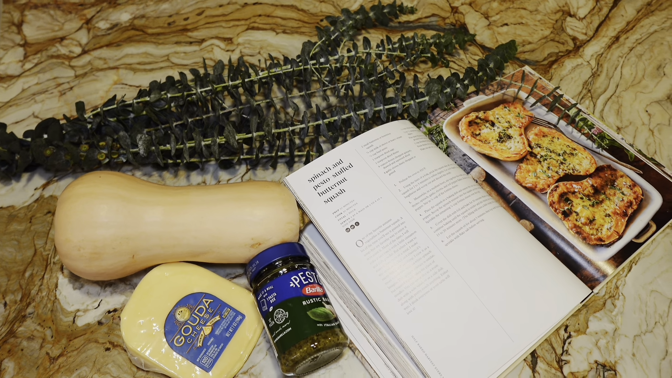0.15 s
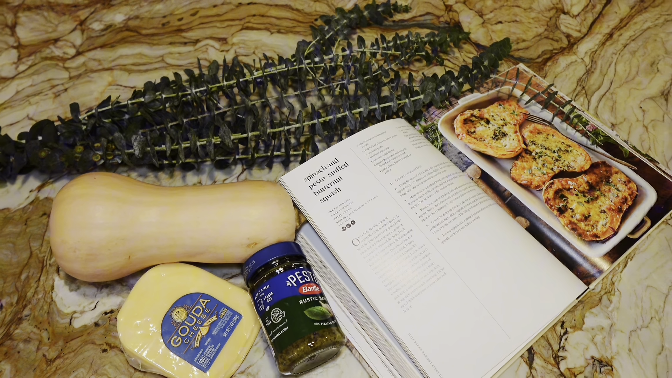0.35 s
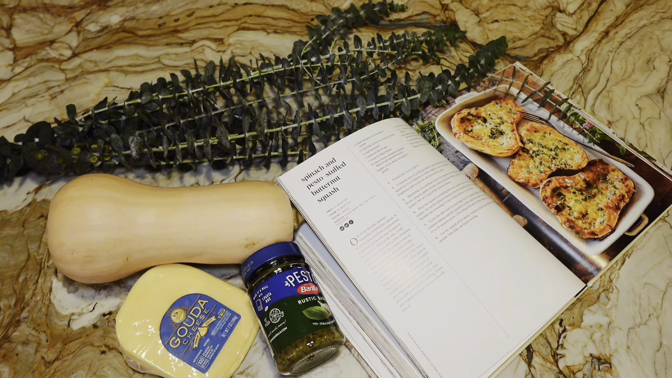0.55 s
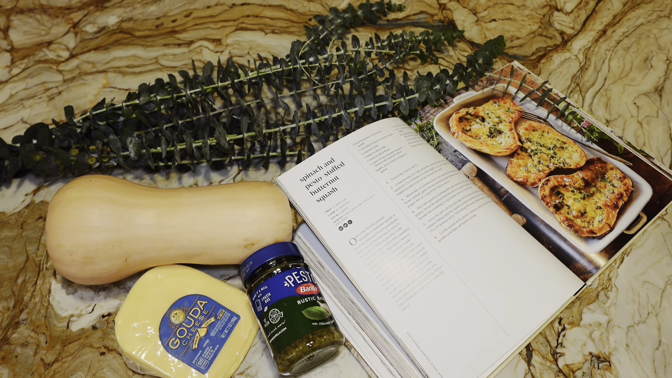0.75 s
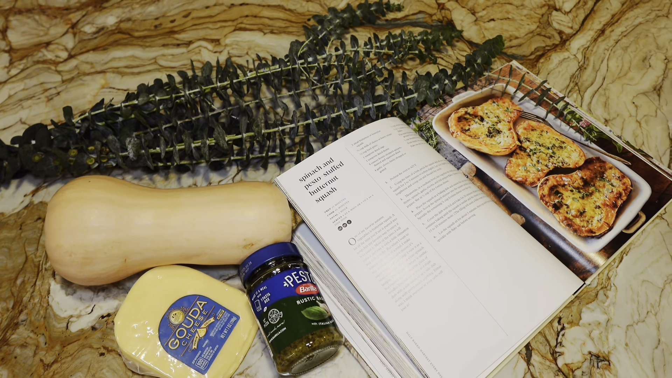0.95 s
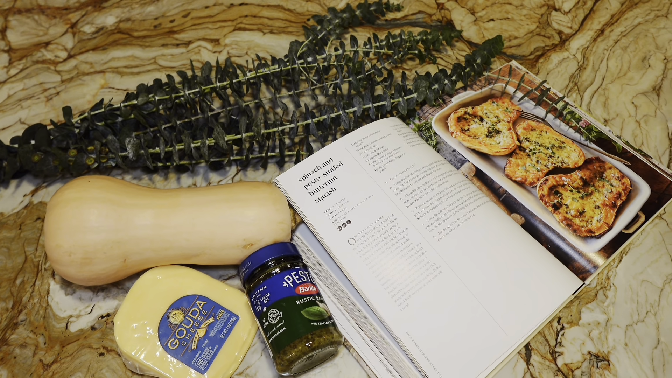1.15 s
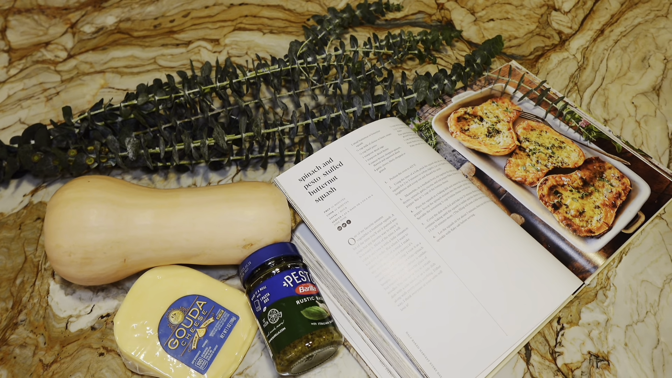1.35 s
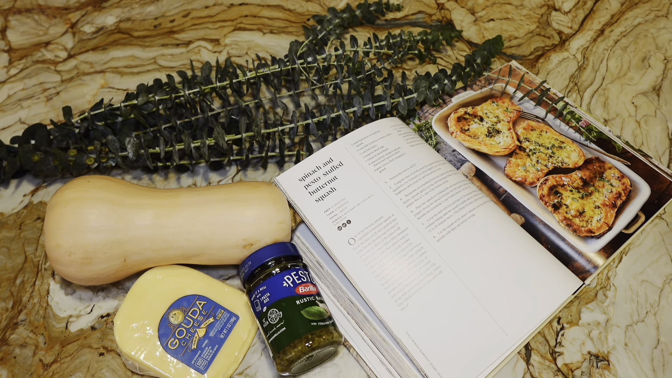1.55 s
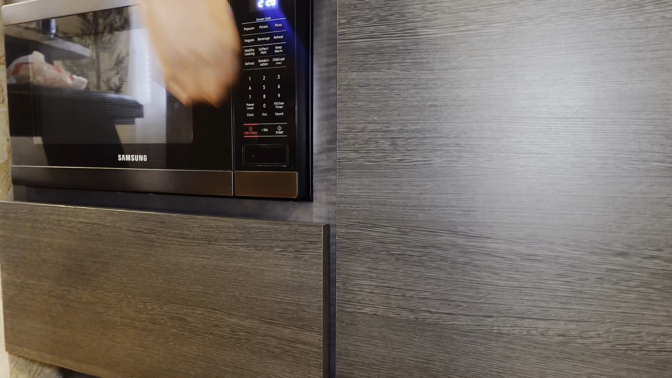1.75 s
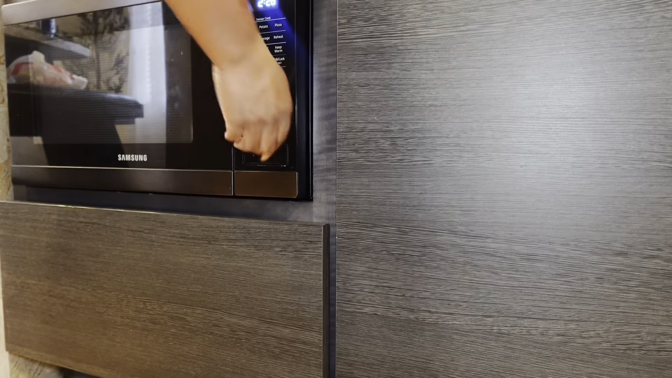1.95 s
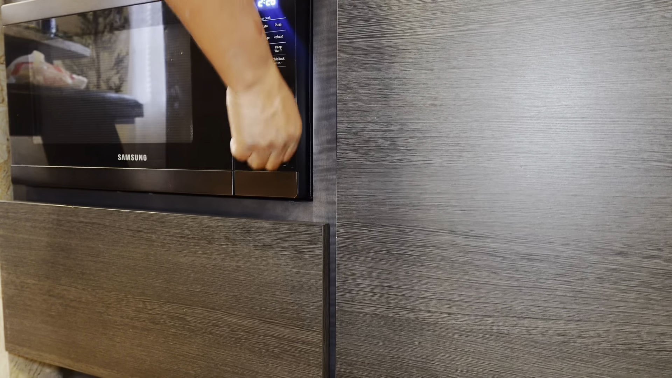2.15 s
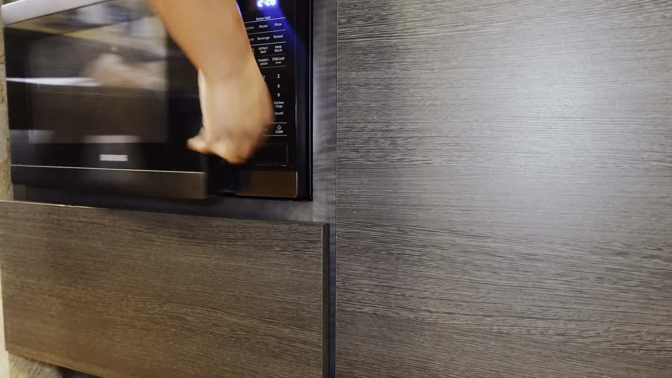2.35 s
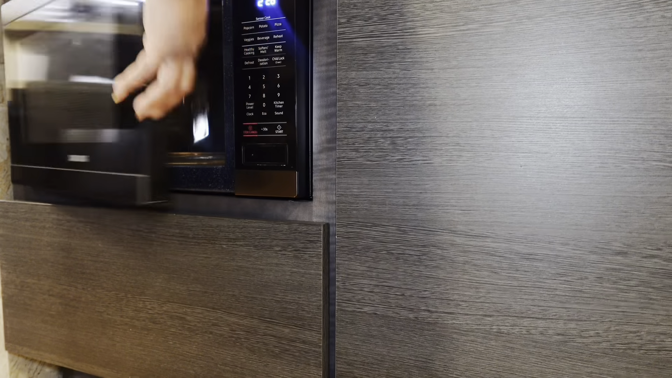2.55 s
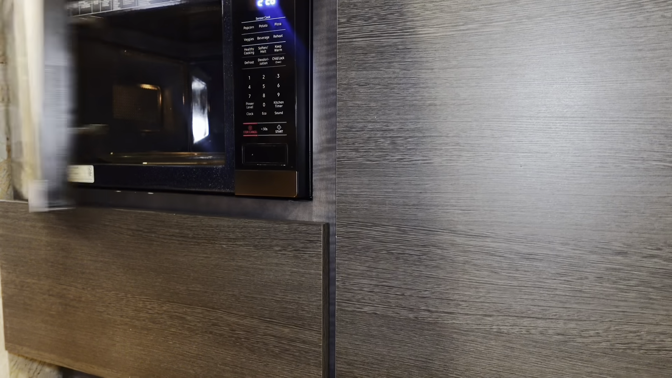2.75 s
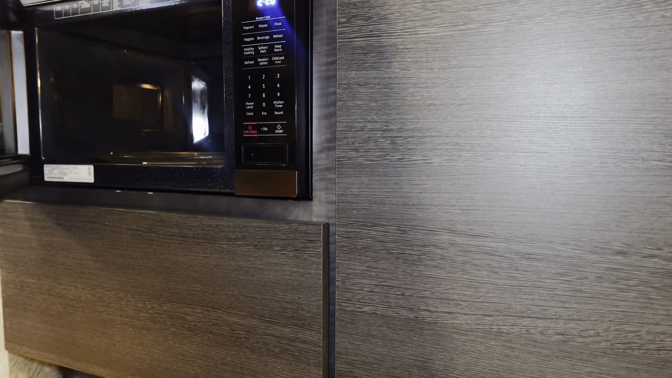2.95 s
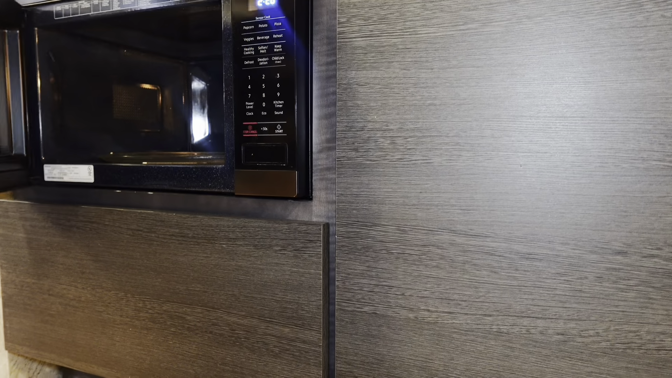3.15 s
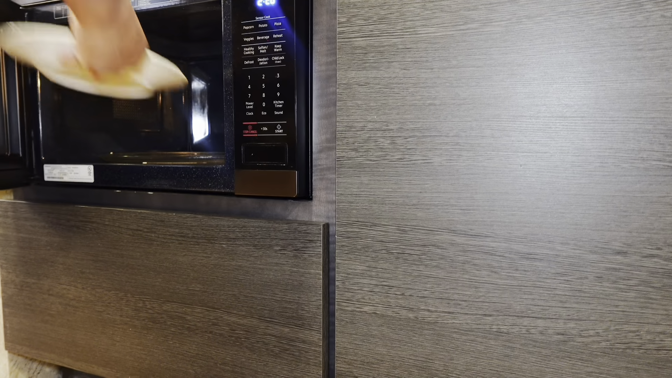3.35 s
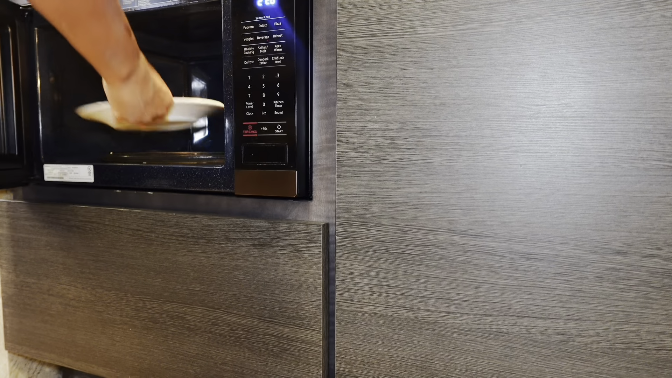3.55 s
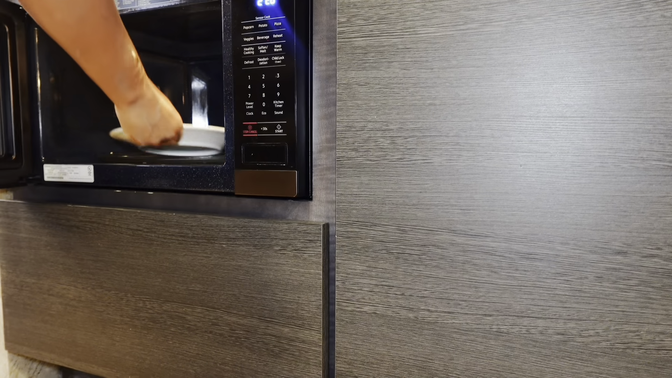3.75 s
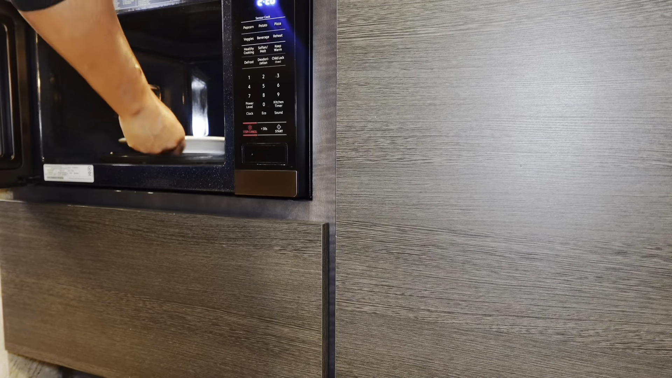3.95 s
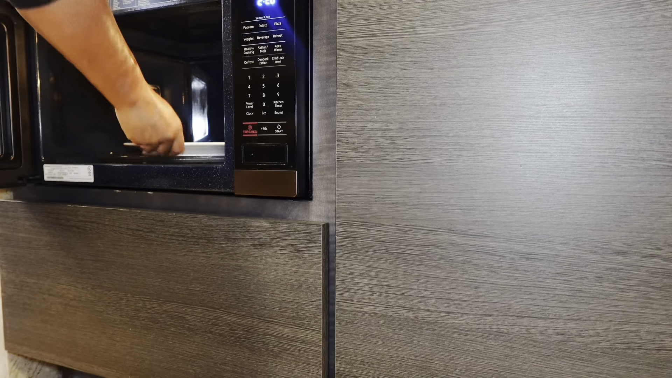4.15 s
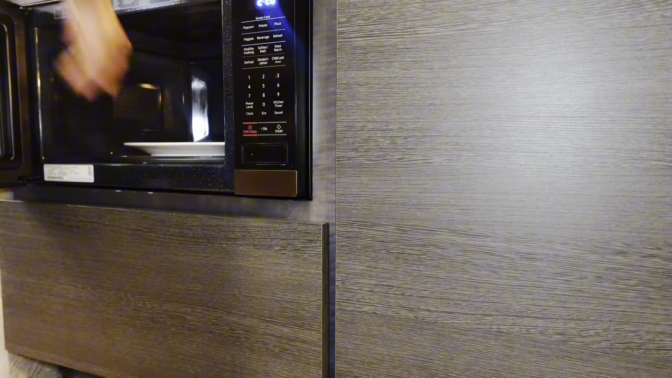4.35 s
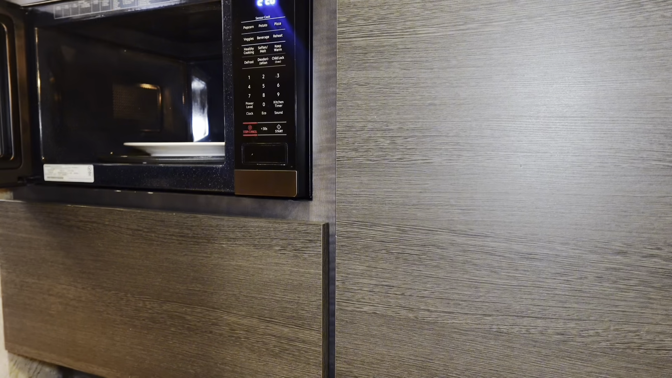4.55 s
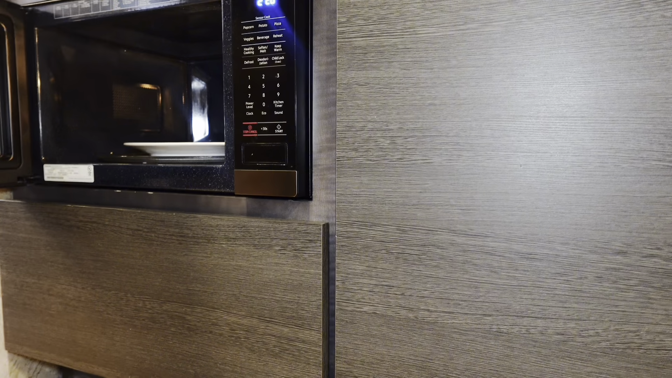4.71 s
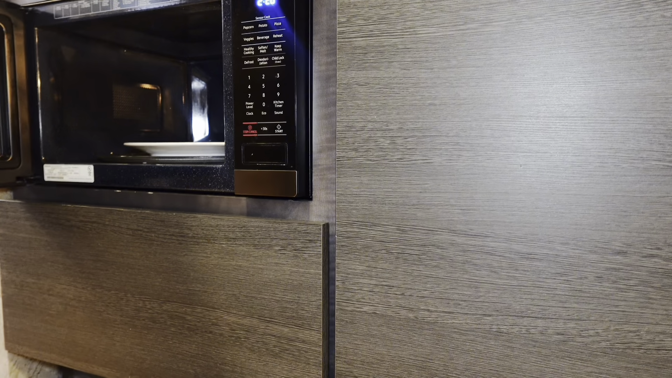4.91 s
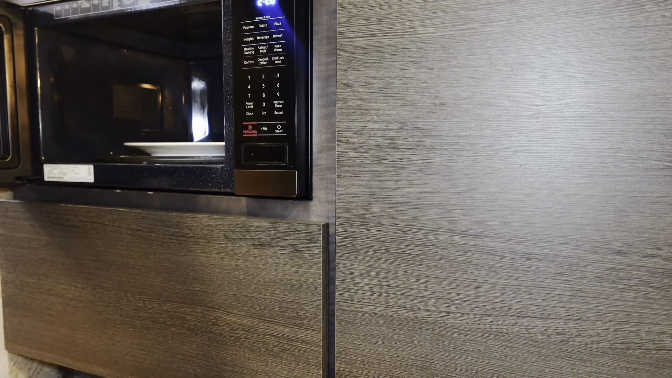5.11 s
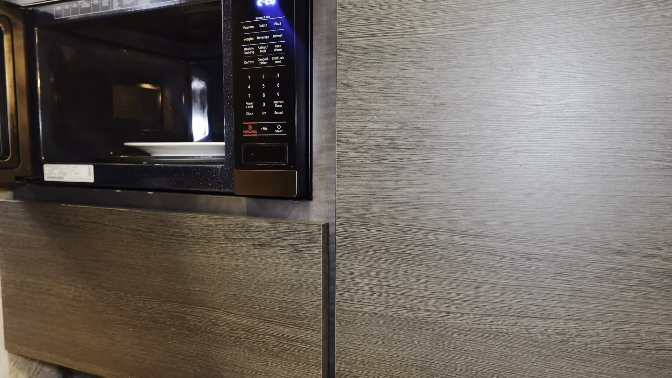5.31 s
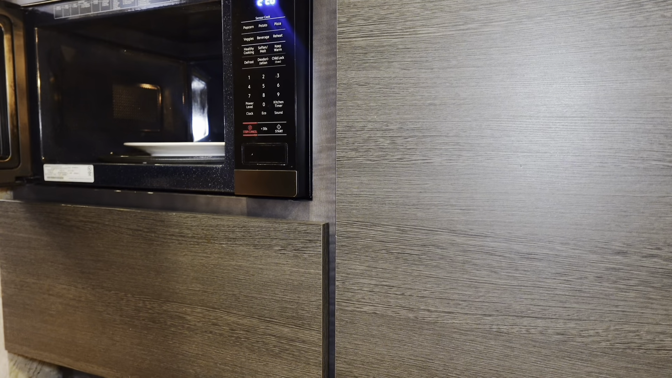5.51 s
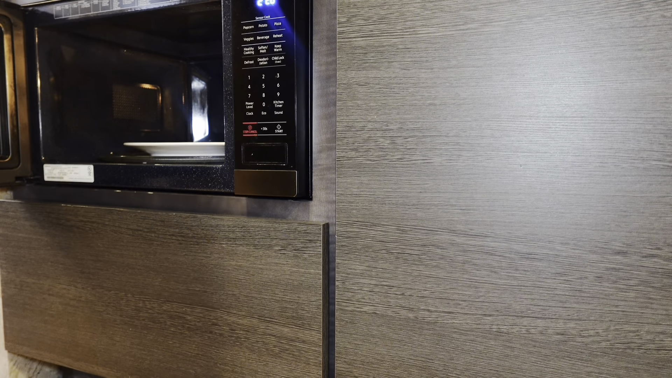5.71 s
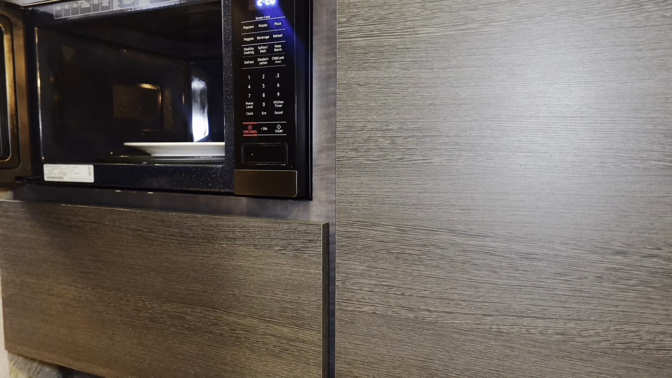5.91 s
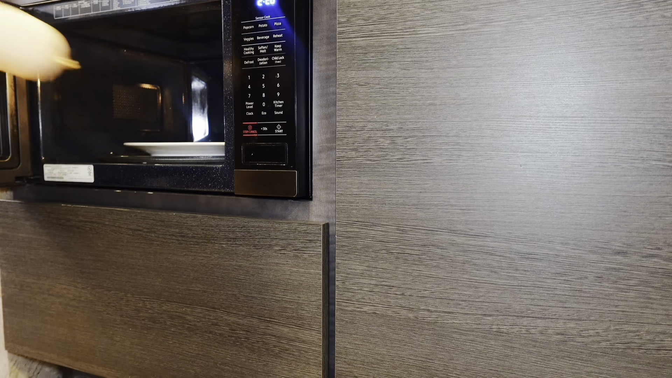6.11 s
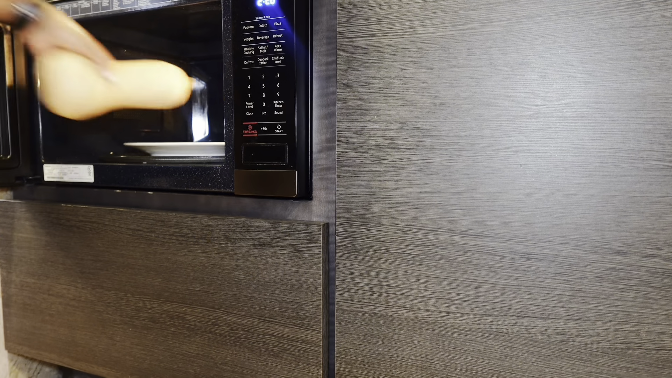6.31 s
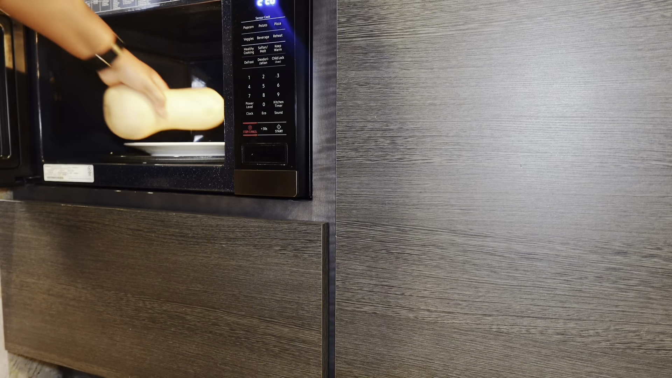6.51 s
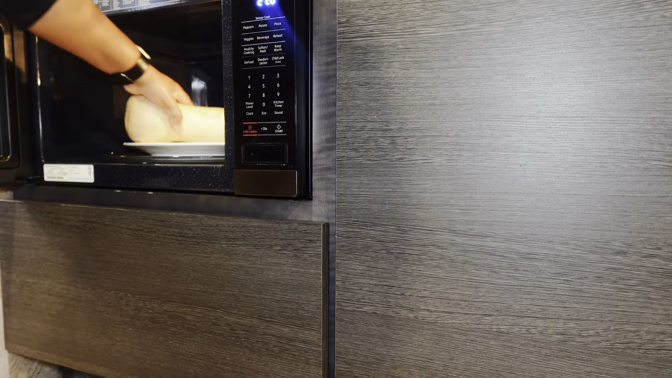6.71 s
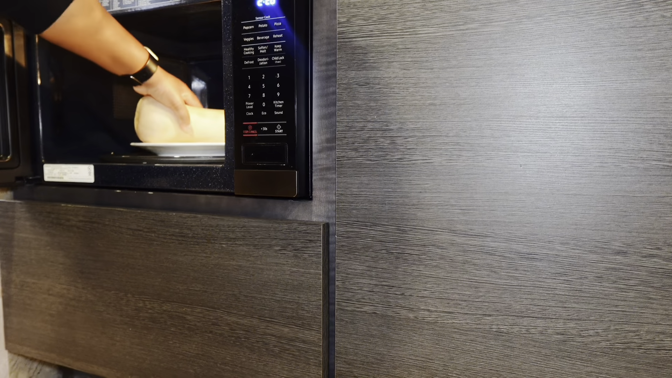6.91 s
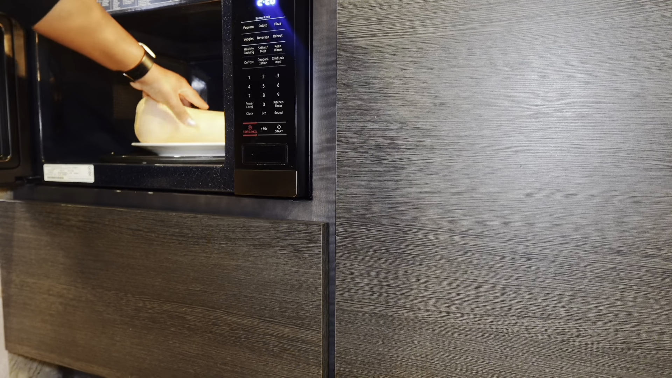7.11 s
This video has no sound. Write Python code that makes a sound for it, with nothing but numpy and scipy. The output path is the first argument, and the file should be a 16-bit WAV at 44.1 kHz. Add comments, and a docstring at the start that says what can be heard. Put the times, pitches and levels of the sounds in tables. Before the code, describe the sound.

Near-silent room hum with one small tick, then close handling of a microwave oven: sharp latch clunks, buzzing loose steel and a dull stop as the door opens. A ceramic plate hits and grates across glass, ringing briefly. The cook shuffles with sleeve rubs and light taps. Finally a heavy squash knocks and rocks on the plate, booming the oven floor. Muffled phone pickup in a reflective kitchen.

```python
"""Microwave oven in a kitchen

A quiet kitchen hums; then, close by, a microwave oven: the button frees the latch, the door swings to its stop.
A plate is slid onto the glass turntable, the cook shuffles about, and a squash is set on the plate.
Knocks are clicks through resonances, scrapes and rattles are gritty noise through modes, cloth is banded grit.
Hard walls add a diffuse tail; a phone with a dull microphone listens."""
import sys
import numpy as np
from scipy import signal
from scipy.fft import rfft, irfft
from scipy.io import wavfile
from scipy.ndimage import uniform_filter1d, minimum_filter1d

SR = 44100
rng = np.random.default_rng(int(sys.argv[2]) if len(sys.argv) > 2 else 0)


def digitize_waveform(pressure):
    """Quantize a signal to 16-bit integers and store it at the path in sys.argv[1].

    Rows of a 2-D input are taken as channels; values are limited to [-1, 1].
    """
    field = np.atleast_2d(pressure).T
    bounded = np.clip(field, -1, 1)
    quanta = np.round(bounded * 32767).astype(np.int16)
    wavfile.write(sys.argv[1], SR, quanta)


N = 316197
T = np.arange(N) / SR
SIDES = np.array([[1], [-1]])  # a side signal enters left and right with opposite signs


def undb(db):
    """Decibel law: amplitude ratio of a level."""
    return 10 ** (np.asarray(db) / 20)


def unit(x):
    """Normalization to an rms of 1."""
    return x / np.sqrt(np.mean(x ** 2))


def level_db(rows):
    """Level contour: (s, dB) points joined by straight lines, silent outside them."""
    s, db = np.transpose(rows)
    return np.interp(T, s, db, left=-200, right=-200)


def colour(x, points):
    """Spectral shaping by (Hz, dB) points on a logarithmic frequency axis."""
    hz, db = np.transpose(points)
    f = np.maximum(np.fft.rfftfreq(x.shape[-1], 1 / SR), 1)
    gain = undb(np.interp(np.log(f), np.log(hz), db))
    return irfft(rfft(x) * gain, x.shape[-1])


def ring(x, hz, width):
    """Simple resonator of the given bandwidth in Hz, with gain 1 at its centre."""
    b, a = signal.iirpeak(hz, hz / width, fs=SR)
    return signal.lfilter(b, a, x)


def band(x, lo_hz, hi_hz):
    """Band-pass filtering between two corner frequencies."""
    return signal.sosfilt(signal.butter(2, [lo_hz, hi_hz], "band", fs=SR, output="sos"), x)


def walk(rate):
    """Slow random modulation: levels held 1 / rate s and smoothed twice, rms 1."""
    k = int(SR / rate)
    steps = np.repeat(rng.standard_normal(N // k + 1), k)
    smooth = uniform_filter1d(uniform_filter1d(steps, k), k)
    return unit(smooth[:N])


def grit(spread_db, patchy_db):
    """Contact noise: dense tiny impacts of uneven size that come in clumps."""
    size = undb(spread_db * rng.exponential(size=N) + patchy_db * walk(90))
    return unit(size * rng.standard_normal(N))


def pair(x, pan_db):
    """Intensity stereo: left stands pan_db above right."""
    return x * undb(pan_db * SIDES / 2)


def swell(s, rise_s, hold_s, fade_s):
    """Exponential envelope: climbs 60 dB in rise_s to 1 at time s, holds, drops 60 dB in fade_s."""
    before = (s - T) / max(rise_s, .002)
    after = np.maximum(T - s - hold_s, 0) / max(fade_s, .01)
    return undb(-60 * np.where(T < s, before, after))


def strokes(rows):
    """Energy addition: layer gains from rows (s, rise s, hold s, fade s, dB per layer), summed in power."""
    shapes = np.array([swell(*row[:4]) for row in rows])
    layers = undb([row[4:] for row in rows]).T
    return np.sqrt(layers ** 2 @ shapes ** 2)


def room(x):
    """Diffuse reverberation: noise decaying at a rate set per band, less alike left and right in the treble."""
    # Decay of the walls. Each row: band centre in Hz, fall by 60 dB in seconds, level in dB.
    wall_bands = [(161, 1, -1.5), (364, 0.67, 2.5), (1020, 0.65, 1.5), (2500, 0.84, -6.5), (5000, 0.27, -1)]
    t = T[:SR]
    tail = 0
    for hz, t60, db in wall_bands:
        mid, side = (unit(band(rng.standard_normal(SR), hz / 1.64, hz * 1.67)) for _ in range(2))
        fade = np.sqrt(hz) * undb(db - 60 * t / t60)
        tail = tail + fade * (mid + np.clip(hz / 4000, .15, .7) * side * SIDES)
    tail = tail * np.clip((t - .008) / 0.017, 0, 1)  # the tail swells in between 8 and 25 ms after the hit
    tail = tail / np.sqrt(np.sum(tail[0] ** 2))
    return signal.fftconvolve(x[None], tail, axes=1)[:, :N]


def air():
    """Background of changing level: shaped noise, pure tones, a hum with a noisy halo, rumble and a hiss."""
    # Spectrum of the kitchen air. Each row: frequency in Hz, density in dB per Hz, relative.
    air_shape = [(25, -27), (80, -15.5), (114, -6), (145, -10.5), (303, -9.5), (350, -16.5), (453, -13),
                 (680, -19), (1670, -20), (2280, -21), (4030, -22.5), (7300, -26), (9490, -59)]
    # Its level. Each row: time in seconds, level in dB.
    air_contour = [(0, -63), (1.68, -65), (1.8, -54.5), (2.7, -57), (3.6, -57), (4.5, -50.5), (5.5, -54),
                   (6.5, -51), (7.17, -51.5)]
    # Thin tones, heard until 1.72 s. Each row: frequency in Hz, rms level in dB.
    early_tones = [(150.7, -71.5), (301.5, -79), (349.9, -86), (452.2, -76.5), (500.6, -75), (699.8, -75.5),
                   (802.1, -81), (1001, -80), (1200, -81), (1249, -84), (1400, -87), (1502, -82),
                   (1900, -82.5), (2299, -94), (2498, -81), (2998, -83)]
    # Mains hum. Each row: time in seconds, level in dB.
    hum_contour = [(0, -60.5), (.35, -59.5), (.75, -66.5), (1.4, -60.5), (1.8, -71), (1.95, -57),
                   (2.3, -62.5), (3.13, -51.5), (3.73, -55), (4.47, -56.5), (4.8, -46.5), (5.2, -53),
                   (5.95, -49), (6.55, -55), (7.07, -49), (7.17, -65.5)]
    # Hiss near the open oven: centre in Hz, width in Hz.
    hiss_band = (1970, 97)
    # Its level. Each row: time in seconds, level in dB.
    hiss_contour = [(1.75, -59), (1.95, -51.5), (2.9, -61), (3.4, -54), (3.7, -58), (4.7, -62.5),
                    (5.5, -59), (6.5, -57.5), (7.17, -55)]
    hum_hz, halo_width_hz, halo_db, octave_db = 119.6, 29, -10.5, -13  # halo and octave relative to the hum

    mid, side = (colour(rng.standard_normal(N), air_shape) for _ in range(2))
    side = colour(side, [(100, -13.0), (1000, -10.5), (3000, -9)])
    scale = np.std(band(mid, 150, 900))  # the level refers to this band
    tone = (mid + side * SIDES) / scale * undb(level_db(air_contour) + 0.64 * walk(2.92))

    lines = 0
    for hz, db in early_tones:
        lines = lines + np.sqrt(2) * undb(db) * np.sin(2 * np.pi * (hz * T + rng.random()))
    lines = lines * (T < 1.72)

    halo = ring(rng.standard_normal(N), hum_hz, halo_width_hz)
    halo = unit(ring(halo, hum_hz, 2 * halo_width_hz))
    turn = 2 * np.pi * hum_hz * T
    hum = np.sin(turn) + undb(octave_db) * np.sin(2 * turn) + undb(halo_db) * halo
    hum = undb(level_db(hum_contour)) * hum

    rumble = undb(-67.5) * unit(band(rng.standard_normal(N), 17, 62))  # deep, from the building
    hiss = unit(ring(rng.standard_normal(N), *hiss_band)) * undb(level_db(hiss_contour))
    return tone + lines + hum + rumble + hiss


def knocks():
    """Impact excitation: a click amid fading chatter rings one part, with a low thump and a bright snap."""
    # Short knocks and ticks. Each row: start in seconds, peak of the ring in dB, ring in Hz,
    # width as a share of it (held to 0.1..2), chatter's fall by 60 dB in seconds, thump, snap and
    # room send in dB relative to the ring, left minus right in dB.
    hits = [(.063, -35, 4610, .5, 0.034, -15, -17, -1.5, 1.5),
            (1.143, -25, 2010, 2.3, 0.012, 0, 8.5, -22, 1), (1.716, -40, 4800, .5, .015, -15, -13, -23, .5),
            (1.863, -18, 1230, 1.4, 0.082, -19, -9, 1, -0.5), (2.08, -24, 2500, 1.8, 0.023, -12, 8, 0, 1),
            (2.121, -6.5, 3230, 1.1, 0.03, -17, -21, -4, 1.5),
            (2.159, -16, 1760, 0.84, 0.029, -18, -12, -27, 8),
            (2.172, -2, 1320, 0.092, 0.057, -35, -3, -9, 2),
            (2.182, -11.5, 1460, 0.72, 0.0257, -9, -22, -23, 4),
            (2.287, -3.5, 1390, 0.083, 0.035, -24, -24, -8, 1.5),
            (2.313, -3, 1390, 2.05, 0.053, -11, -1.5, -17, 2),
            (2.394, -13, 4530, 0.23, 0.017, -23, -18, -20, 3.5),
            (2.567, -8, 284, 1.84, 0.012, 2, -34, -26.5, 0.5),
            (2.953, -33, 4610, 0.35, 0.017, -20, -19, -9, 4),
            (3.704, -3, 1060, 0.079, 0.026, -37, -4, -18.5, .5),
            (3.995, -8.5, 1760, 0.44, 0.022, -29, -5.5, 11.5, -1),
            (4.522, -17.5, 2900, 0.89, 0.021, -19, -14, -26, 0),
            (4.589, -12, 2300, 0.4, 0.016, -1, -5, -32, 0), (4.64, -27, 1320, 0.52, 0.049, -7, -1, -23, 0),
            (4.67, -22.5, 1790, 0.63, 0.041, -9.5, -20, -26, 1),
            (4.859, -32.5, 2060, 1.2, 0.027, -24, -24, -17, 20),
            (5.031, -8.5, 2900, 0.15, 0.019, -0.5, -35, -5.5, 0),
            (5.072, -21, 3030, 0.24, 0.045, -18, -20, -25, -2),
            (5.474, -31.5, 1870, 2, 0.014, -4, 2.5, -27, 5), (5.842, -30, 1380, 0.24, 0.024, -33, -7, 6, 4),
            (5.873, -25.5, 1770, 0.2, .015, -35, 5, -16, 13),
            (6.544, -9.5, 1130, 0.21, 0.012, -20, -11, 9, 0.5),
            (6.717, -5.5, 1260, 0.074, 0.062, -20, -27.5, -4, 0.5),
            (7.099, -14, 1300, 0.17, .028, -24, -38, -4.5, 1.5)]
    near, sent = np.zeros((2, N + SR)), np.zeros(N + SR)
    t = T[:SR // 10]
    click_s = .003
    click = 1. * (np.arange(len(t)) == int(click_s * SR))

    def peak(x):
        """Normalization to a peak of 1."""
        return x / np.abs(x).max()

    for s, db, hz, share, t60, thump_db, snap_db, room_db, pan_db in hits:
        noise = rng.standard_normal(len(t))
        fade = np.clip(t / 0.0024, 0, 1) ** 2 * undb(-60 * np.maximum(t - click_s, 0) / t60)
        contact = click + undb(-19) * fade * noise
        gains = undb(db + np.array([0, thump_db, snap_db]))
        part = ring(ring(contact, hz, np.clip(share, .1, 2) * hz), hz, 3.5 * hz)
        thump = -band(contact, 190, 1250)
        snap = -band(contact, 2300, 8100)
        hit = gains @ np.array([peak(part), peak(thump), peak(snap)])
        i = int(s * SR)
        near[:, i:i + len(t)] += pair(hit, pan_db)
        # the walls hear every side of the part, so its colour reaches them smoothed
        blunt = gains[0] * peak(ring(click, hz, hz)) + gains[2] * peak(band(click, 3000, 7200))
        sent[i:i + len(t)] += undb(room_db) * blunt
    return near[:, :N] + room(sent[:N])


def rustle():
    """Fibre friction: slipping fibres make grit under a broad spectral hump; each rub has its own centre."""
    # Cloth stirring all the while the cook is near. Each row: time in seconds, level in dB.
    stir_contour = [(1.68, -72), (1.74, -51.5), (2.6, -54), (3.0, -52.5), (3.55, -53.5), (3.7, -57.5),
                    (4.4, -43), (4.9, -51), (5.39, -66), (6.5, -59), (7.17, -63)]
    # Single rubs of sleeve, hand or foot. Each row: peak time in seconds, peak in dB,
    # fall by 60 dB in seconds (at least 0.01), centre in Hz, width in octaves.
    single_rubs = [(1.89, -42, -0.34, 2200, .8), (2.075, -53, 2.5, 2080, .8), (2.953, -48.5, 0.1, 3800, .6),
                   (4.53, -36.5, 0.16, 2870, .8), (4.655, -45, 1.8, 1940, 0.95),
                   (4.91, -43.5, -0.1, 2700, 0.96), (5.1, -42.5, 1.36, 3150, 0.25),
                   (5.47, -43, 1.2, 2570, 1), (5.72, -43, 0.9, 3630, 0.49), (5.885, -36.5, 0.82, 1840, 0.5),
                   (5.905, -33, 0.32, 4340, 0.35), (6.138, -34.5, 0.87, 4320, 0.78)]
    stir_hz, stir_octaves, rub_rise_s = 2200, 0.9, 0.21
    centres = 700 * 2 ** np.arange(0, 3.4, .5)
    bands = [[unit(ring(grit(0.7, 0.92), hz, hz / 1.12)) for _ in range(2)] for hz in centres]

    def hump_db(centre_hz, octaves):
        """Spectral envelope: level of every band under a hump of unit power."""
        weight = 1 / (1 + (np.log2(centres / centre_hz) / octaves) ** 2) ** 1.16
        return 20 * np.log10(weight / np.sqrt(np.sum(weight ** 2)))

    rows = [(s, rub_rise_s, 0, fade_s, *(db + hump_db(hz, octaves)))
            for s, db, fade_s, hz, octaves in single_rubs]
    stir_db = level_db(stir_contour) + 0.74 * walk(20)
    stir = undb(hump_db(stir_hz, stir_octaves)[:, None] + stir_db)
    gains = np.hypot(strokes(rows), stir)
    cloth = sum(g * (mid + 0.43 * side * SIDES) for g, (mid, side) in zip(gains, bands))
    return pair(cloth, .8)


def rattle():
    """Forced vibration: loose steel parts buzz through the case resonances and a broad body."""
    # Jolts that shake the latch springs and door. Each row: peak time in seconds,
    # fall by 60 dB in seconds, level in dB, bass and treble in dB relative to it.
    jolts = [(2.088, 0.9, -38.5, -4.5, 3), (2.129, 0.9, -32.5, -8.5, -3), (2.175, 0.76, -17, -3, -3.5),
             (2.296, 0.65, -28, -5.5, -1.5), (2.325, 0.2445, -17.5, -10.5, -7.5),
             (2.44, 0.45, -33.5, -6, -2), (2.553, 0.36, -43, -7.5, 3)]
    # Case resonances. Each row: frequency in Hz, width in Hz, gain in dB.
    case_modes = [(452, 220, -12), (740, 92, 4.5), (990, 420, -11.5), (1390, 170, -1), (1810, 390, -4),
                  (2320, 180, -1.5), (3400, 490, -15.5), (4080, 220, -31), (5140, 380, -19),
                  (5700, 300, -21)]
    rise_s = 0.057  # over 60 dB
    gains = strokes([(s, rise_s, 0, fade_s, db + bass_db, db, db + treble_db)
                     for s, fade_s, db, bass_db, treble_db in jolts])
    drive = grit(2, 1.5)
    body = undb(-12.5) * drive
    for hz, width, db in case_modes:
        body = body + undb(db) * ring(drive, hz, width)
    edges = [(80, 510), (600, 1690), (2500, 8300)]  # bass, middle, treble in Hz
    return sum(g * unit(band(body, *edge)) for g, edge in zip(gains, edges))


def stick_slip(rows, modes, between_db, swell_db):
    """Stick-slip friction: grit drives modes that swell alone, each aimed its own way, as the contact wanders."""
    drive = grit(0.93, 0.94)
    edges = [300, 800, 1450, 2300, 3450, 7500]  # bass, middle, ring, presence, treble in Hz
    groups = np.array([undb(between_db) * band(drive, *edge) * np.ones((2, 1))
                       for edge in zip(edges, edges[1:])])
    for k, (hz, width, db) in enumerate(modes):
        mode = ring(drive * undb(swell_db * walk(16)), hz, width)
        aim = 1 + min(hz / 7000, .35) * rng.uniform(-1.5, 1.5) * SIDES
        groups[np.searchsorted(edges, hz) - 1] += (-1) ** k * undb(db) * aim * mode
    friction = sum(g * unit(x) for g, x in zip(strokes(rows), groups))
    touch_s = 0.0038  # first contact, ahead of the first stroke's full level
    return friction * (T > rows[0][0] - touch_s)


def plate_on_glass():
    """Friction-driven plate modes: the plate slides over the glass turntable."""
    # Strokes. Each row: time of full level in seconds, rise over 60 dB in seconds (at least 0.002),
    # hold in seconds, fall by 60 dB in seconds (at least 0.01), then dB of bass, middle, ring,
    # presence and treble modes.
    slides = [(3.716, 1, 0.024, .5, -29.5, -24.5, -18, -25, -21.5),
              (3.765, -0.77, 0.095, 0.9958, -24.5, -23.5, -17.5, -23, -20.5),
              (3.968, 1, 0.011, -0.1, -38, -19.5, -27, -32.5, -34),
              (3.997, .04, 0.0035, 0.09, -36, -25, -11.5, -19, -20.5),
              (4.03, 0.25, 0.056, .5, -40, -26, -21.5, -20.5, -21),
              (4.14, -0.7, .01, 0.58, -43, -34, -26.5, -33, -29)]
    # Plate modes. Each row: frequency in Hz, width in Hz, gain in dB.
    plate_modes = [(395.2, 32.7, -7), (404.5, 33.3, -3.5), (464, 27, -9.5), (644, 14, -11.5), (739, 20, -9),
                   (868, 18, -7.5), (964, 63, -3), (1094, 132, -6), (1215, 54, -7), (1430, 21, -18.5),
                   (1700, 76, 0.5), (1760, 12, 10.5), (1915, 94, -2), (2680, 193, -9.5), (2742, 67, -4),
                   (2900, 74, -6), (3190, 49, -14), (3817, 98, -15.5), (3900, 31, -9.5), (3983, 65, -9),
                   (4540, 33, -47), (5040, 71, -14), (5190, 120, -19.5), (5360, 160, -13.5),
                   (6070, 44, -41), (7100, 74, -20.5)]
    return stick_slip(slides, plate_modes, -25, 1.5)


def footfalls():
    """Low-frequency impact: each soft step is a short deep bump of the floor."""
    # Steps. Each row: time in seconds, peak in dB.
    steps = [(4.59, -33.5), (5.033, -31.5)]
    hz, fade_s = 50, .12
    return sum(undb(db) * swell(s, .01, 0, fade_s) * np.sin(2 * np.pi * hz * (T - s)) for s, db in steps)


def squash_on_plate():
    """Mass loading: the squash rocks on the plate, and its weight damps and shifts the plate's modes."""
    # Strokes of the settling squash. Each row: time of full level in seconds, rise over 60 dB
    # in seconds, hold in seconds, fall by 60 dB in seconds, then dB of bass, middle, ring,
    # presence and treble modes.
    rocking = [(6.547, 0.021, .003, 0.26, -40, -22.5, -25.5, -22, -24),
               (6.57, 0.17, 0.024, 0.49, -33, -27, -24.5, -25.5, -28.5),
               (6.722, 0.048, 0.0036, 0.14, -28.5, -15, -21.5, -19.5, -29),
               (6.75, .15, 0.0076, 0.46, -28.5, -32, -38.5, -36, -45.5),
               (7.115, .05, 0.026, .3, -52, -42, -43, -56, -58)]
    # Modes of the loaded plate. Each row: frequency in Hz, width in Hz, gain in dB.
    loaded_modes = [(476, 43, -3), (702, 48, 2), (889, 38, 2), (1060, 290, -3.5), (1260, 30, 0.5),
                    (1690, 49, 6), (1958, 27, 3), (2585, 290, 5.5), (3110, 145, 7), (3270, 100, -1.5),
                    (3824, 130, 2), (4030, 140, -4), (4260, 100, -31), (5200, 130, -33.5), (6400, 75, -12)]
    return stick_slip(rocking, loaded_modes, -17.0, 1.0)


def landings():
    """Damped free vibration: a soft heavy blow booms the steel floor; the heavier one reaches its lowest mode."""
    # Blows of the squash. Each row: start in seconds, level in dB, extra on the lowest mode in dB.
    blows = [(6.584, -30, -7), (6.721, -27, 11.5)]
    # Oven floor. Each row: frequency in Hz, fall by 60 dB in seconds, level in dB.
    floor_modes = [(133.5, 0.41, -11.5), (266.5, 0.68, 0.8)]
    out = 0
    for s, db, deep_db in blows:
        t = np.maximum(T - s, 0)
        onset = np.minimum(t / 0.0062, 1)
        for (hz, t60, mode_db), reach_db in zip(floor_modes, (deep_db, 0)):
            decay = undb(db + mode_db + reach_db - 60 * t / t60)
            out = out + decay * onset * np.sin(2 * np.pi * hz * t)
    return out


def scene():
    """Superposition: all sources, with a shared wall tail for door, plate and squash."""
    door = pair(rattle(), -0.16)
    plate = pair(plate_on_glass(), 0.58)
    squash = pair(squash_on_plate() + landings(), 0.33)
    walls = room(undb(-17.0) * door[0] + undb(-14.0) * plate[0] + undb(-17.0) * squash[0])
    return air() + knocks() + rustle() + door + plate + footfalls() + squash + walls


def record(dry):
    """Transducer response: a dull microphone, look-ahead peak limiter, cut top and small converter offset."""
    # Microphone response. Each row: frequency in Hz, gain in dB.
    mic_response = [(20, -15.5), (60, -8), (100, 0), (4500, -1), (6000, -6), (7400, -19.5), (8500, -26),
                    (9700, -38), (20000, -78.5)]
    top_hz, window = 15700, SR // 200  # limiter window in samples
    heard = colour(dry, mic_response)
    need = np.minimum(.95 / (np.abs(heard).max(axis=0) + 1e-9), 1)
    gain = uniform_filter1d(minimum_filter1d(need, size=window), size=window)
    low_pass = signal.ellip(8, .2, 70, top_hz, fs=SR, output="sos")
    return signal.sosfilt(low_pass, gain * heard) + .0013


dry = scene()
out = record(dry)
digitize_waveform(out)
```